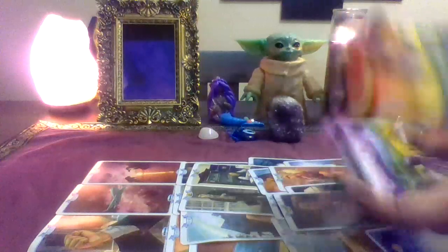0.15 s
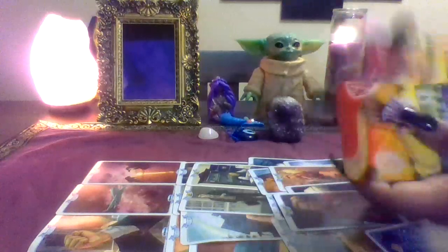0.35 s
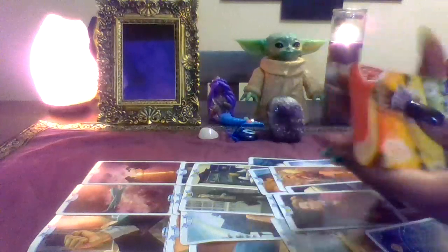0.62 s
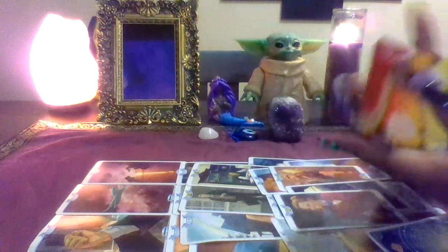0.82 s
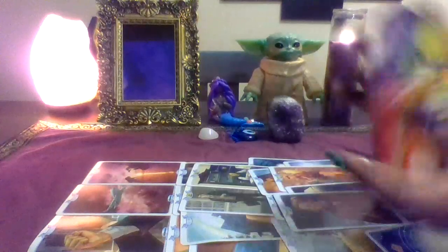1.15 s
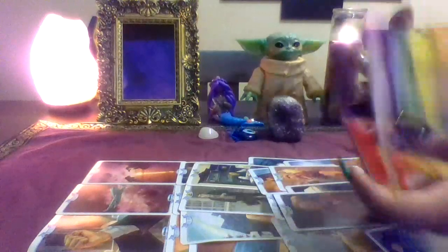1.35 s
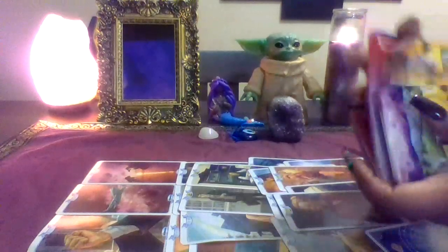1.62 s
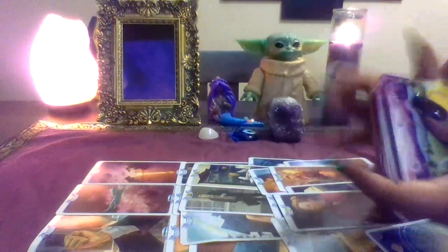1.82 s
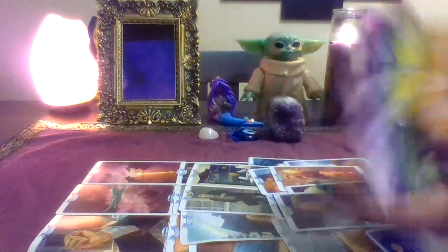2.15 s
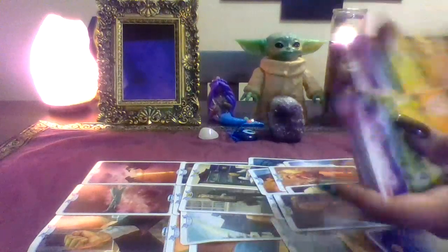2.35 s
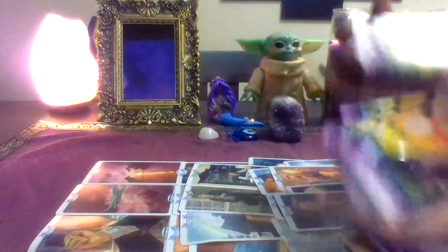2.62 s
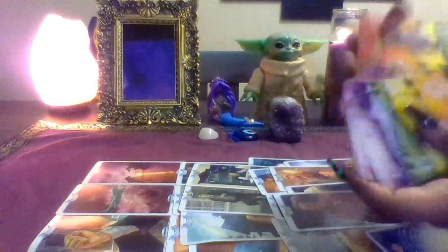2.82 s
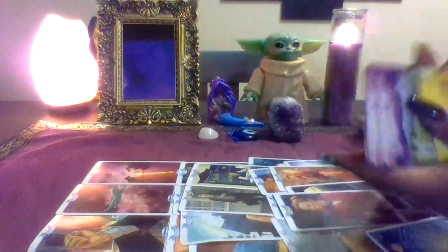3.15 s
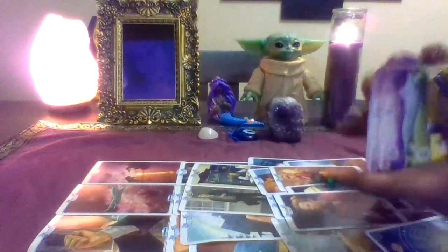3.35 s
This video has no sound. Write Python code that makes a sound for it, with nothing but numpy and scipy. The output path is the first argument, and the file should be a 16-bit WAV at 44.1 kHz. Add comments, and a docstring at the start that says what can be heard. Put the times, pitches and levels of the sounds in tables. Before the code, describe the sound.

Card shuffling up close: irregular bright snaps and short papery swishes over a faint room hum

```python
"""Overhand card shuffle, close up

Packets of cards slide over each other: dense random grains shaped into a bright hiss and a duller scrape.
Edges land as decaying ticks, knocks and rattles; the packet thuds and the deck rings low, in a short room.
Underneath: filtered-noise room floor, rumble and buzz, and a thin electronic whine made of sines.
The signal drops out once for a tenth of a second. Both channels are identical."""
import sys
import numpy as np
from scipy import signal
from scipy.fft import rfft, irfft
from scipy.io import wavfile
from scipy.ndimage import uniform_filter1d

SR = 44100
rng = np.random.default_rng(int(sys.argv[2]) if len(sys.argv) > 2 else 0)


def master(y):
    """Save y as 16-bit WAV."""
    cut = np.clip(np.atleast_2d(y).T, -1, 1)
    pcm = np.round(cut * 32767)  # scale
    wavfile.write(sys.argv[1], SR, pcm.astype(np.int16))


N = 154350
HISS_TOP_HZ = 15750  # upper limit of the coloured noises and the tick noise


def amp(db):
    """Decibels to amplitude."""
    return 10 ** (np.asarray(db) / 20)


def evened(x):
    """Scales to unit RMS."""
    return x / np.sqrt(np.mean(x ** 2) + 1e-20)


def add(mix, start_s, sound):
    """Mixes a sound in at a time, cut at the end of the mix."""
    part = mix[round(start_s * SR):][:len(sound)]
    part += sound[:len(part)]


def coloured(x, points):
    """Filters to the table's spectrum: -60 dB below it, last level held up to HISS_TOP_HZ, then silent."""
    point_hz, point_db = np.transpose(points)
    hz = np.fft.rfftfreq(len(x), 1 / SR)
    gain_db = np.interp(np.log(hz + 1), np.log(point_hz + 1), point_db, left=-60)
    gain = amp(gain_db) * (hz < HISS_TOP_HZ)
    return evened(irfft(rfft(x) * gain, len(x)))


def narrow(hz, width_hz):
    """Narrow-band noise, a wavering tone: slow complex noise shifted up to hz."""
    lowpass = signal.butter(2, width_hz / 2, fs=SR)
    slow = signal.lfilter(*lowpass, rng.standard_normal((2, N)))
    carrier = np.exp(2j * np.pi * hz * np.arange(N) / SR)
    return evened(((slow[0] + 1j * slow[1]) * carrier).real)


def whine():
    """Electronic whine: steady upper harmonics, without the fundamental."""
    fundamental_hz = 2602.9
    # Whine partials: (harmonic number, RMS level [dB])
    partials = [(2, -73), (3, -72), (4, -80), (5, -76), (6, -71)]
    t = np.arange(N) / SR
    return sum(amp(db) * np.sqrt(2) * np.sin(2 * np.pi * k * fundamental_hz * t) for k, db in partials)


def background():
    """Room noise and microphone hiss as shaped noise, a low rumble, a narrow high buzz and the whine."""
    floor_db, rumble_db, buzz_db = -58, -52.5, -66.5  # RMS
    rumble_hz, rumble_width_hz = 27, 11.7
    buzz_hz, buzz_width_hz = 13150, 180
    # Spectrum of room noise and microphone hiss: (frequency [Hz], relative density [dB per Hz])
    floor_spectrum = [(40, -2.5), (72, -7), (200, -8), (400, -20), (1400, -46.5), (3000, -48), (6500, -33),
                      (11000, -34), (13500, -43.5), (15700, -52.5)]
    noise = amp(floor_db) * coloured(rng.standard_normal(N), floor_spectrum)
    rumble = amp(rumble_db) * narrow(rumble_hz, rumble_width_hz)
    buzz = amp(buzz_db) * narrow(buzz_hz, buzz_width_hz)
    return noise + rumble + buzz + whine()


def room(x):
    """Short soft tail from the near walls and table: convolution with decaying noise."""
    room_db, room_t60_s, gap_s = -11, .06, .002
    t = np.arange(8000) / SR
    tail = rng.standard_normal(8000) * amp(-60 * t / room_t60_s) * (t > gap_s)
    tail = uniform_filter1d(tail, size=2)  # softens the treble
    return amp(room_db) * signal.oaconvolve(x, tail / np.linalg.norm(tail))[:N]


def thuds():
    """Packet dropping into the palm: a low pitchless push of air, one pulse with an undershoot."""
    thud_s = .0018
    # Packet drops: (time [s], level [dB])
    drops = [(.4355, -32), (1.349, -43), (1.797, -39), (2.9582, -29)]
    out = np.zeros(N)
    u = np.arange(2000) / SR / thud_s
    for start_s, db in drops:
        add(out, start_s, -amp(db) * np.e * u * (1 - u / 3) * np.exp(-u))
    return out


def thumps():
    """Lowest ring of the whole deck in the hand: a decaying sine."""
    thump_hz, thump_t60_s = 441, .042
    # Deck rings: (time [s], level [dB])
    rings = [(.134, -34), (.4365, -39), (1.279, -39), (2.629, -45), (2.754, -43)]
    out, t = np.zeros(N), np.arange(2000) / SR
    for start_s, db in rings:
        add(out, start_s, amp(db - 60 * t / thump_t60_s) * np.sin(2 * np.pi * thump_hz * t))
    return out


def tick(t, hz, noise, rise_s):
    """Card edge snapping: a very short tone plus band noise, unit peak."""
    tick_t60_s, noise_gain = .0023, .4
    band = signal.butter(2, [hz * .7, min(hz * 1.25, HISS_TOP_HZ)], "band", fs=SR)
    snap = np.sin(2 * np.pi * hz * t) + noise_gain * evened(signal.lfilter(*band, noise))
    sound = np.minimum(t / rise_s, 1) * amp(-60 * t / tick_t60_s) * snap
    return sound / abs(sound).max()


def knock(t, hz):
    """Damped knock of the packet: a sine rising over half a cycle, unit peak."""
    ring_cycles, longest_t60_s = 7.5, .009  # the shorter ring wins
    turns = hz * t
    decay = amp(-60 * np.maximum(turns / ring_cycles, t / longest_t60_s))
    sound = np.sin(2 * np.pi * turns) * np.minimum(2 * turns, 1) * decay
    return sound / abs(sound).max()


def rattle(t, knock_hz, noise):
    """Loose cards rattling on: noise through deck resonances and a band around the knock, dying away."""
    rattle_db, rattle_t60_s = -18, .02  # level relative to the knock peak
    # Deck resonances: (frequency [Hz], gain [dB])
    resonances = [(470, 4.5), (870, -9.5), (1400, 1), (2100, -13.5), (3200, -2)]
    deck = sum(amp(db) * signal.lfilter(*signal.iirpeak(hz, 8, SR), noise) for hz, db in resonances)
    band = signal.butter(1, [knock_hz / 2, knock_hz * 4], "band", fs=SR)
    return evened(signal.lfilter(*band, deck)) * amp(rattle_db - 60 * t / rattle_t60_s)


def clicks():
    """Card edges landing: each a bright tick, a packet knock and a dying rattle."""
    rise_s = .0002  # tick
    # Landings: (time [s], tick peak [dB], tick pitch [Hz], knock peak before rattle [dB], knock pitch [Hz])
    landings = [(0.114, -17.0, 13760.0, -18.0, 2000.0), (0.1192, -17.0, 10570.0, -8.0, 1600.0),
                (0.1274, -32.0, 11050.0, -26.0, 1500.0), (0.1467, -14.0, 13540.0, -29.0, 1100.0),
                (0.1511, -20.0, 13540.0, -33.0, 1360.0), (0.1718, -20.0, 13050.0, -36.0, 4480.0),
                (0.1777, -17.0, 12800.0, -21.0, 3000.0), (0.1924, -22.0, 11990.0, -33.0, 3770.0),
                (0.4348, -31.0, 13350.0, -27.0, 1850.0), (0.4752, -31.0, 11260.0, -32.0, 1310.0),
                (0.8648, -18.0, 11000.0, -29.0, 3380.0), (0.8695, -19.0, 11260.0, -30.0, 4310.0),
                (1.1052, -22.0, 10500.0, -35.0, 5400.0), (1.1946, -24.0, 8460.0, -28.0, 1300.0),
                (1.2024, -31.0, 9000.0, -30.0, 1700.0), (1.279, -19.0, 10420.0, -23.0, 2400),
                (1.2817, -28.0, 11330.0, -26.0, 1290.0), (1.3498, -24.0, 12500.0, -39.0, 1500.0),
                (1.3762, -28.0, 13890.0, -33.0, 520), (1.7631, -11.0, 8440.0, -29.0, 3040.0),
                (1.7681, -25.0, 14710.0, -34.0, 2300.0), (1.8019, -28.0, 10470.0, -36.0, 1600.0),
                (1.9538, -31.0, 13500.0, -57.0, 4000.0), (2.0268, -34.0, 11000.0, -32.0, 5100.0),
                (2.038, -42.0, 6000.0, -29.0, 4320.0), (2.2, -38.0, 5000.0, -34.0, 1300.0),
                (2.3721, -14.0, 14230.0, -27.0, 3800.0), (2.3809, -31.0, 14880.0, -35.0, 1400),
                (2.3832, -40.0, 9000.0, -37.0, 850), (2.6295, -34.0, 10850.0, -40.0, 1420),
                (2.7535, -28.0, 14530.0, -31.0, 1400.0), (2.7971, -27.0, 8030.0, -39.0, 2860.0),
                (2.9141, -18.0, 14710.0, -44.0, 2260.0), (2.9415, -40.0, 11000.0, -35.0, 2140.0),
                (2.9575, -32.0, 7500.0, -32.0, 1500.0), (2.9601, -30.0, 11560.0, -33.0, 420),
                (3.2903, -27.0, 11890.0, -23.0, 3850.0), (3.357, -20.0, 13140.0, -46.0, 4630.0)]
    out, t = np.zeros(N), np.arange(2000) / SR
    noises = rng.standard_normal((len(landings), 2000))
    for (start_s, tick_db, tick_hz, knock_db, knock_hz), noise in zip(landings, noises):
        add(out, start_s - rise_s, amp(tick_db) * tick(t, tick_hz, noise, rise_s))
        body = knock(t, knock_hz) + rattle(t, knock_hz, noise[::-1])
        add(out, start_s - .5 / knock_hz, amp(knock_db) * body)
    return out


def patchy(x):
    """Random louder and softer patches across time and frequency."""
    patch_db = 2.3  # RMS gain variation
    z = signal.stft(x, nperseg=256)[2]
    patches = rng.standard_normal(z.shape[::-1]).T
    patches = uniform_filter1d(patches, size=7, axis=0)  # frequency bins
    patches = uniform_filter1d(patches, size=9, axis=1)  # time frames
    return evened(signal.istft(z * amp(patch_db * evened(patches)), nperseg=256)[1][:N])


def grit():
    """Dense tiny slips of paper on paper, uneven in size and clumped over a few milliseconds."""
    grains_per_s, grain_spread_db, clump_db = 30000, 1.1, 1.9
    slips = (rng.random(N) < grains_per_s / SR) * rng.standard_normal(N)
    sizes = amp(grain_spread_db * np.minimum(rng.exponential(1, N), 4))
    clumps = evened(uniform_filter1d(rng.standard_normal(N), size=150))
    return slips * sizes * amp(clump_db * clumps)


def slides():
    """Cards sliding: the same slips heard as bright hiss and, through the packet, as duller scrape."""
    # Slide envelope: (time [s], hiss level [dB], scrape level [dB])
    envelope = [(0.0, -63, -58.5), (0.11, -65, -62.5), (0.115, -28, -18.5), (0.118, -33, -34.5),
                (0.149, -38, -39), (0.27, -54, -56.5), (0.313, -37.5, -47), (0.395, -42.5, -51),
                (0.431, -55, -51.5), (0.435, -39, -38.5), (0.469, -35, -48), (0.481, -33, -38.5),
                (0.497, -34, -46.5), (0.501, -42, -46), (0.567, -57.5, -61), (0.713, -54, -63),
                (0.815, -56, -64.5), (0.861, -49, -64), (0.865, -41, -49), (0.971, -56, -63),
                (1.008, -47, -57.5), (1.048, -58, -66), (1.102, -44, -57.5), (1.108, -35, -56.5),
                (1.129, -47.5, -62.5), (1.148, -41, -49), (1.193, -59, -63), (1.194, -42, -40),
                (1.215, -64, -52.5), (1.276, -62, -61.5), (1.279, -29, -39), (1.285, -44.5, -44.5),
                (1.342, -43.5, -51.5), (1.373, -32.5, -43.5), (1.398, -38.5, -50), (1.405, -48, -61.5),
                (1.451, -56.5, -56), (1.53, -43, -58.5), (1.64, -45, -58.5), (1.688, -37, -49),
                (1.722, -55.5, -67), (1.754, -44, -50), (1.759, -40, -51), (1.804, -36, -48),
                (1.878, -59, -63.5), (1.95, -61.5, -67.5), (1.969, -50, -61), (2.019, -53.5, -60.5),
                (2.033, -47, -56), (2.152, -51.5, -61.5), (2.198, -42, -52), (2.233, -41.5, -48),
                (2.275, -41, -57.5), (2.312, -58, -62), (2.371, -51, -58), (2.372, -36, -45.5),
                (2.438, -44.5, -54.5), (2.454, -41, -52), (2.483, -56.5, -63.5), (2.601, -49, -63),
                (2.631, -51.5, -53), (2.66, -60.5, -66.5), (2.749, -60, -60.5), (2.753, -37.5, -47),
                (2.868, -42, -55.5), (2.89, -52, -58), (2.935, -42, -49.5), (2.957, -40.5, -37),
                (2.98, -41.0, -56), (3.016, -34, -47.5), (3.068, -53.5, -60.5), (3.138, -60.5, -66),
                (3.19, -51.5, -62), (3.23, -55, -62.5), (3.265, -36, -47.5), (3.31, -50.5, -59),
                (3.413, -58.5, -63), (3.489, -53.5, -61)]
    # Spectra of hiss and scrape: (frequency [Hz], relative density [dB per Hz])
    hiss_spectrum = [(1500, -54), (3000, -14.5), (4500, -7.5), (9000, -5), (11500, 0), (13300, 3),
                     (14500, 2), (15700, -2)]
    scrape_spectrum = [(120, -9), (450, -3), (1300, -4), (2600, -3.5), (3600, -7), (6000, -16.5)]
    time_s, hiss_db, scrape_db = np.transpose(envelope)
    t, slips = np.arange(N) / SR, grit()
    hiss = amp(np.interp(t, time_s, hiss_db)) * patchy(coloured(slips, hiss_spectrum))
    scrape = amp(np.interp(t, time_s, scrape_db)) * patchy(coloured(slips, scrape_spectrum))
    return hiss + scrape


def scene():
    """One microphone feeds both channels; only the hits excite the room tail."""
    hits = clicks() + thuds() + thumps()
    mono = slides() + hits + room(hits) + background()
    return np.array([mono, mono])


def record(dry):
    """Silences the dropout, then limits the band."""
    edge_hz = 16800
    # Dropout: (start [s], end [s])
    dropout = (1.535, 1.6362)
    t = np.arange(N) / SR
    live = dry * ((t < dropout[0]) | (t > dropout[1]))
    lowpass = signal.firwin(511, edge_hz, window=("kaiser", 11), fs=SR)
    return signal.oaconvolve(live, lowpass[None], "same")


dry = scene()
out = record(dry)
master(out)
```